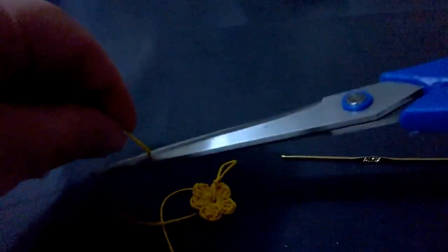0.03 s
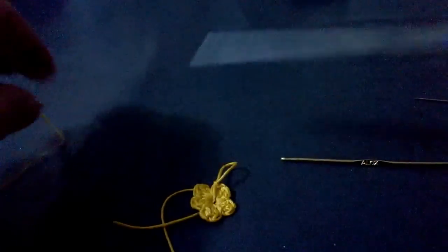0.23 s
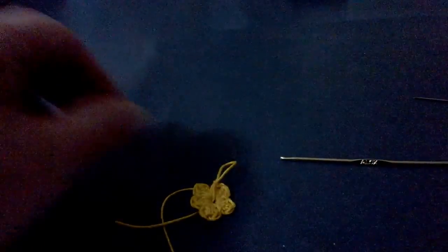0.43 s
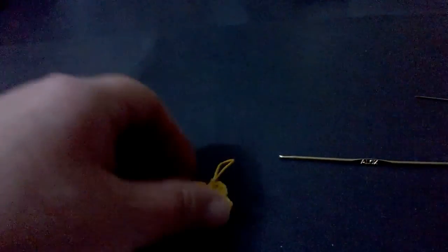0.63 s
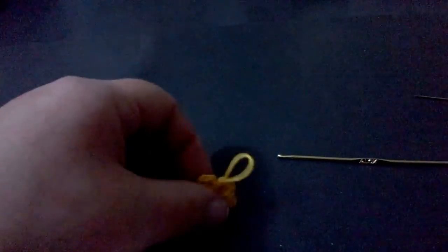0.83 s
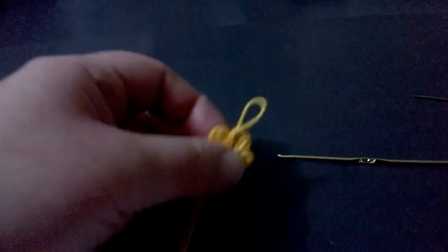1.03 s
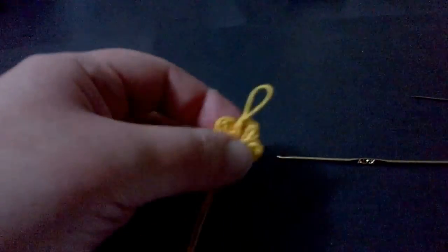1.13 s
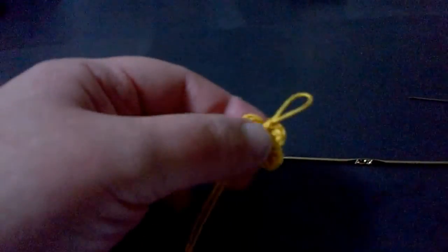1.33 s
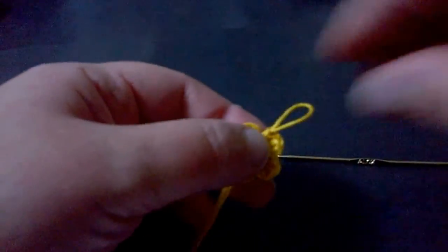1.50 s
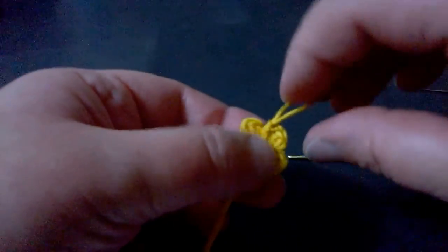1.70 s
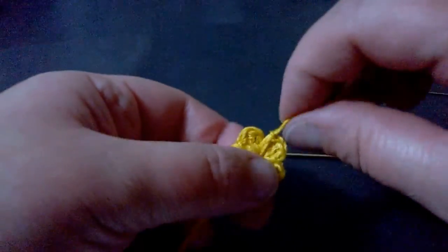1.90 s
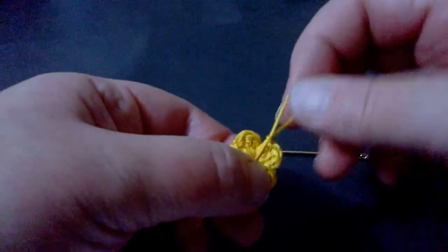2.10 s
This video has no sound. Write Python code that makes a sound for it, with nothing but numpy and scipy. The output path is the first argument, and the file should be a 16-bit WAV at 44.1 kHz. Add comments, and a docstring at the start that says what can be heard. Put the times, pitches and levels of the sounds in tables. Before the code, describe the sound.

Steel scissors snip a thread at about 0.2 seconds, one sharp, close click with a brief small-room ring. Fingers rustle faintly on yarn from 0.5 seconds. A hand bumps a cloth-covered desk softly at 1.1 seconds, and near 1.4 seconds the scissors are put down with a dull knock and a light tick. Faint rubbing continues to about 2 seconds. A small fan whirs very quietly throughout, its whine wavering.

```python
"""A small fan whirs, its blade-rate whine swelling and fading throughout. Almost at once steel scissors
snip a cotton thread close to the microphone: the impact excites the blades' modes, and a small room
reverberates. Later a hand bumps the cloth-covered desk softly, the scissors are put down with a dull
knock of the desk's modes, and fingers handle the crochet work with a faint friction noise."""
import sys
import numpy as np
from scipy import signal
from scipy.fft import rfft, irfft, next_fast_len
from scipy.io import wavfile
from scipy.ndimage import map_coordinates

SR = 44100
rng = np.random.default_rng(int(sys.argv[2]) if len(sys.argv) > 2 else 0)


def generate_wav(signal):
    """Clip the signal to [-1, 1] and save it as 16-bit WAV at the path in sys.argv[1]."""
    frames = np.transpose(np.atleast_2d(signal))
    scaled = np.clip(frames, -1, 1) * 32767
    pcm = np.round(scaled).astype(np.int16)
    wavfile.write(sys.argv[1], SR, pcm)


N = 94815
TIME = np.arange(N) / SR
SNIP_S = 0.205  # the blades first meet


def amp(db):
    """Decibels to amplitude ratio."""
    return 10 ** (np.asarray(db) / 20)

def along(points, hz):
    """Interpolation of (frequency, value) points on a log-frequency axis."""
    freqs, values = np.transpose(points)
    return np.interp(np.log(hz + 1), np.log(freqs + 1), values)

def envelope(rows):
    """Amplitude envelope through (time, level) points."""
    return amp(np.interp(TIME, *np.transpose(rows)))

def wobble(rate):
    """Smooth random modulation, `rate` knots a second."""
    return map_coordinates(rng.standard_normal(N // 40), [TIME * rate], mode="mirror")

def filtered(x, response):
    """Linear filtering: the spectrum of x times a frequency response."""
    size = next_fast_len(N + SR // 2)
    return irfft(rfft(x, size) * response(np.fft.rfftfreq(size, 1 / SR)), size)[:N]

def noise(colour):
    """White noise shaped to a relative spectrum, at rms 1."""
    x = filtered(rng.standard_normal(N), lambda hz: amp(along(colour, hz)))
    return x / np.sqrt(np.mean(x ** 2) + 1e-20)

def fade(t, t60):
    """Exponential decay, 60 dB in t60 seconds."""
    return np.exp(-np.log(1000) * t / t60)

def at(start, x):
    """Delay of x by `start` seconds."""
    return np.pad(x, (max(round(start * SR), 0), 0))[:N]

def ring(modes, alternate=False):
    """Modal superposition: damped sines, optionally of alternating polarity."""
    sign = -1 if alternate else 1
    return sum(sign ** k * amp(db) * fade(TIME, t60) * np.sin(2 * np.pi * hz * TIME)
               for k, (hz, db, t60) in enumerate(modes))

def impulse(colour, size=2048):
    """Minimum-phase click of a given spectrum, from the folded cepstrum."""
    cepstrum = irfft(np.log(amp(along(colour, np.fft.rfftfreq(size, 1 / SR)))))
    cepstrum[1:size // 2] *= 2
    cepstrum[size // 2 + 1:] = 0
    return np.pad(irfft(np.exp(rfft(cepstrum))), (0, N - size))

def soften(x, cutoff_hz):
    """A compliant contact acts as a low-pass filter."""
    return signal.sosfilt(signal.butter(3, cutoff_hz, fs=SR, output="sos"), x)


# background spectrum (frequency [Hz], relative level [dB])
FLOOR_SPECTRUM = [(20, -1.5), (40, 0), (80, -5), (200, -8), (420, -5.5), (750, -16.5), (1500, -8.5),
                  (4000, -23.5), (8000, -28.5), (15000, -36.5)]

def noise_floor():
    """Stationary broadband noise, strongest in the bass."""
    return amp(-65) * noise(FLOOR_SPECTRUM)


# air noise of the whir and around the whine (frequency [Hz], relative level [dB])
WHIR_SPECTRUM = [(700, -22.5), (1000, -9), (1300, 1.5), (1550, -3.5), (1880, -1.5), (2080, -5.5),
                 (2300, -14), (3400, -16), (4400, -29), (8000, -62)]
HISS_SPECTRUM = [(1500, -39), (1800, -1.5), (1900, -1), (1995, -0.5), (2070, -5.5), (2200, -10.5),
                 (2600, -43)]
# envelopes of the whir, the whine, and the fifth harmonic relative to the whir (time [s], level [dB])
WHIR_LEVEL = [(0, -64.5), (.3, -63.5), (.48, -61), (.6, -62.5), (.94, -61), (1.12, -61.5), (1.3, -61.5),
              (1.42, -64), (1.49, -59.5), (1.58, -62.5), (1.72, -64.5), (1.79, -59.5), (1.86, -66),
              (1.95, -61.5), (2.15, -63.5)]
WHINE_LEVEL = [(0, -89), (.17, -104), (.26, -61), (.32, -67.5), (.42, -58.5), (.5, -55.5), (.6, -59.5),
               (.72, -60.5), (.8, -59), (1.0, -60.5), (1.15, -65), (1.33, -65.5), (1.44, -74.5),
               (1.56, -66.5), (1.65, -61.5), (1.73, -72.5), (1.85, -65.5), (1.92, -54.5), (2.04, -63),
               (2.15, -56)]
FIFTH_LEVEL = [(0, -17), (.3, -8), (.5, -6), (.75, -13.5), (1.1, -2.5), (1.3, -23), (1.48, 1), (1.67, -20),
               (1.79, -5), (2.15, -9.5)]

def fan(blade_hz=285.03):
    """Harmonics of the blade-passing frequency, slightly unsteady, ride on turbulent air noise."""
    def harmonic(order):
        flutter = amp(wobble(25.14))
        phase = 2 * np.pi * order * blade_hz * TIME + 0.18 * wobble(25.15)
        return np.sqrt(2) * flutter * np.sin(phase)
    whir = noise(WHIR_SPECTRUM) + envelope(FIFTH_LEVEL) * harmonic(5) + amp(-9.5) * harmonic(6)
    whine = harmonic(7) + amp(-8.5) * noise(HISS_SPECTRUM)
    return envelope(WHIR_LEVEL) * whir + envelope(WHINE_LEVEL) * whine


def swell(centre, half_width):
    """Gaussian envelope, 17 dB down at `half_width` seconds from its centre."""
    return np.exp(-2 * ((TIME - centre) / half_width) ** 2)

def hum(hz=425):
    """A faint tone with random phase modulation swells and passes."""
    phase = 2 * np.pi * hz * TIME + 0.42 * wobble(30.35)
    return amp(-62) * swell(1.871, 0.18) * np.sin(phase)


# finger strokes (time [s], half-width [s], rumble level [dB], rustle level [dB])
RUBS = [(0.57, 0.13, -92, -65), (0.846, 0.19, -69, -70.5), (1.433, 0.036, -55.5, -64.5),
        (1.917, 0.3, -60.5, -73.5)]
# fingernail contacts (time [s], level [dB])
NAIL_TICKS = [(0.52, -58), (.598, -60), (1.05, -62)]
# spectra of the three handling noises (frequency [Hz], relative level [dB])
RUMBLE_SPECTRUM = [(20, -2), (36, 9), (55, -13), (100, -23), (300, -54)]
RUSTLE_SPECTRUM = [(40, -25), (100, 2), (140, 1), (210, -15), (290, 4.5), (450, -19), (800, -39),
                   (3000, -61)]
NAIL_SPECTRUM = [(300, -24), (1200, -16), (2400, 15), (3700, -4), (5000, -30), (12000, -37)]

def fingers():
    """Sliding friction on cloth gives swells of noise; nail impacts give short bursts."""
    rumble = noise(RUMBLE_SPECTRUM) * sum(amp(db) * swell(s, width) for s, width, db, _ in RUBS)
    rustle = noise(RUSTLE_SPECTRUM) * sum(amp(db) * swell(s, width) for s, width, _, db in RUBS)
    nails = sum(at(s, amp(db) * noise(NAIL_SPECTRUM) * fade(TIME, t60=0.019)) for s, db in NAIL_TICKS)
    return rumble + rustle + nails


# the hand meets the desk (time [s], level [dB])
BUMPS = [(1.118, -48), (1.137, -49.5)]
# low desk modes (frequency [Hz], relative level [dB], T60 [s])
BUMP_MODES = [(44.8, -24, .1), (94, 4.5, 0.075), (138.3, -1.5, 0.24), (237, -5, .05)]

def hand_bumps():
    """A soft impact excites only the desk's low modes."""
    bump = soften(ring(BUMP_MODES), cutoff_hz=256)
    return sum(at(s, amp(db) * bump) for s, db in BUMPS)


# the scissors meet the desk (time [s], knock gain [dB], cutoff [Hz], tick level [dB])
KNOCKS = [(1.358, -1, 1640, -48.5), (1.365, -7, 606, -58), (1.3719, -4.5, 1130, -58),
          (1.3802, -1, 340, -68), (1.3965, -14, 504, -89)]
# desk modes (frequency [Hz], level [dB], T60 [s])
DESK_MODES = [(76, -48.5, 0.21), (146, -46.5, 0.19), (223, -47, 0.19), (269.3, -34.5, 0.12),
              (378.3, -41, 0.11), (502, -39, 0.032), (622, -46, 0.089), (869, -44.5, 0.055),
              (1052, -32, 0.021), (1190, -34.5, 0.016), (1433, -56, 0.02)]
# spectra of the blades' tick and the desk's rattle (frequency [Hz], relative level [dB])
TICK_SPECTRUM = [(2000, -26), (6500, -25), (8200, 4), (9500, -11), (11000, 6), (12300, 7.5), (14000, -23),
                 (16000, -35)]
RATTLE_SPECTRUM = [(30, -15), (150, -24), (550, 6), (750, -7), (1200, -11), (1600, -15.5), (3000, -30.5),
                   (8000, -54)]

def scissors_put_down(tick_attack_s=0.00048):
    """Impacts cushioned by cloth excite the desk's modes; the blades tick and the desk rattles."""
    wood, knocks = ring(DESK_MODES), np.zeros(N)
    tick_shape = fade(TIME, t60=0.015) * (1 - np.exp(-TIME / tick_attack_s))
    for start, knock_db, cutoff_hz, tick_db in KNOCKS:
        knock = amp(knock_db) * soften(wood, cutoff_hz)
        tick = amp(tick_db) * noise(TICK_SPECTRUM) * tick_shape
        knocks += at(start, knock + tick)
    rattle = amp(-39.5) * noise(RATTLE_SPECTRUM) * fade(TIME, t60=0.18)
    return knocks + at(KNOCKS[0][0], rattle)


# spectrum of the snip's tail, shared by the scrape (frequency [Hz], relative level [dB])
TAIL_SPECTRUM = [(100, -5), (700, -26), (1400, -1), (3000, -7.5), (4400, -16), (6300, -6.5), (7500, 1.5),
                 (9000, 3.5), (12000, -1.5), (13500, -11), (16000, -40)]
# the room's initial decay (frequency [Hz], T60 [s])
ROOM_T60 = [(200, 0.27), (2500, 0.32), (8500, 0.24), (12000, 0.16), (15000, .16)]

def reverberation(delay_s=0.004, build_s=0.011, fall_s=0.12):
    """The snip's diffuse field: each noise band decays at its own rate, all faster towards fall_s."""
    hz, times, bands = signal.stft(noise(TAIL_SPECTRUM), SR, nperseg=256)
    decay = fade(times, along(ROOM_T60, hz)[:, None])
    tail = signal.istft(bands * decay, SR)[1][:N]
    shape = (1 - np.exp(-TIME / build_s)) * np.exp(-(TIME / fall_s) ** 4)
    return at(SNIP_S + delay_s, amp(-38) * tail * shape)


# peaks of the scrape (time [s], level [dB])
SCRAPES = [(0.2116, -41), (0.2195, -38.5), (0.229, -45)]

def blade_scrape():
    """Friction between the shut blades gives brief peaks of bright noise."""
    return noise(TAIL_SPECTRUM) * sum(amp(db) * fade(abs(TIME - s), t60=0.018) for s, db in SCRAPES)


# echoes from near walls (delay [s], gain [dB])
WALL_ECHOES = [(.008, -20), (.0118, -14), (.0142, -15), (.0152, -23)]

def early_reflections(direct, cutoff_hz=4000):
    """Specular reflection: near walls return delayed, high-passed copies."""
    bright = signal.sosfilt(signal.butter(1, cutoff_hz, "high", fs=SR, output="sos"), direct)
    return sum(at(delay, amp(db) * bright) for delay, db in WALL_ECHOES)


# modes of the plastic handles (frequency [Hz], level [dB], T60 [s])
HANDLE_MODES = [(75, -43.5, 0.041), (348, -39.5, 0.019), (482, -40.5, 0.016)]

def handle_thump():
    """Heavily damped low modes sound as the handles meet."""
    return at(SNIP_S, ring(HANDLE_MODES))


# blade contacts (time [s], level [dB])
CONTACTS = [(.205, -6), (0.2062, -17), (.2067, -15)]
# blade modes (frequency [Hz], level [dB], T60 before clamping [s])
BLADE_MODES = [(2320, -24.5, 0.029), (3010, -27, .03), (3690, -29.5, 0.022), (5180, -34.5, .02),
               (6300, -33, 0.023), (7120, -27.5, 0.03), (8150, -27, 0.018), (9150, -35.5, .02),
               (9900, -34.5, 0.017), (10900, -42, .02), (11800, -34, 0.018), (12500, -36, .02)]
# spectrum of the contacts and the lead-in hiss (frequency [Hz], relative level [dB])
CRACK_SPECTRUM = [(60, -5.5), (250, -2.5), (480, 1), (800, -6), (1300, 0), (1800, -6.5), (2700, -1.5),
                  (4500, -4), (8000, -4.5), (12200, -5), (13500, -13), (16000, -24)]

def snip(hiss_peak_s=0.2028, clamp_s=0.0028):
    """A brief hiss swells into the clack: impact rings the blades' modes until clamping damps them."""
    clamp = np.exp(-(TIME / clamp_s) ** 4)
    clack = at(SNIP_S, ring(BLADE_MODES, alternate=True) * clamp)
    crack = impulse(CRACK_SPECTRUM)
    for start, db in CONTACTS:
        grind = amp(-28) * noise(CRACK_SPECTRUM) * fade(TIME, t60=0.0086)
        clack += at(start, amp(db) * (crack + grind))
    hiss_t60 = np.where(TIME < hiss_peak_s, 0.018, 0.011)  # rise, then fall
    lead_in_hiss = amp(-37.5) * noise(CRACK_SPECTRUM) * fade(abs(TIME - hiss_peak_s), hiss_t60)
    return lead_in_hiss + clack + early_reflections(clack)


def scene():
    """Superposition of all sources at one microphone."""
    cut = snip() + handle_thump() + blade_scrape() + reverberation()
    handling = scissors_put_down() + hand_bumps() + fingers()
    background = hum() + fan() + noise_floor()
    return (cut + handling + background)[None]

def record(dry):
    """Band limiting: an ideal low-pass removes everything above 15.8 kHz."""
    return np.array([filtered(channel, lambda hz: hz < 15800) for channel in dry])


dry = scene()
out = record(dry)
generate_wav(out)
```